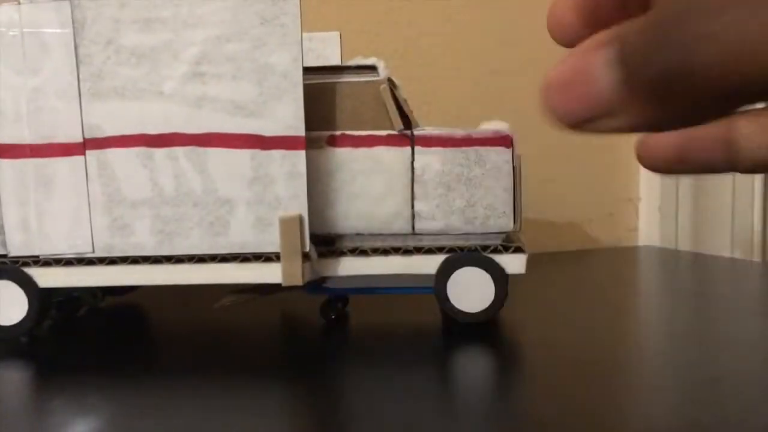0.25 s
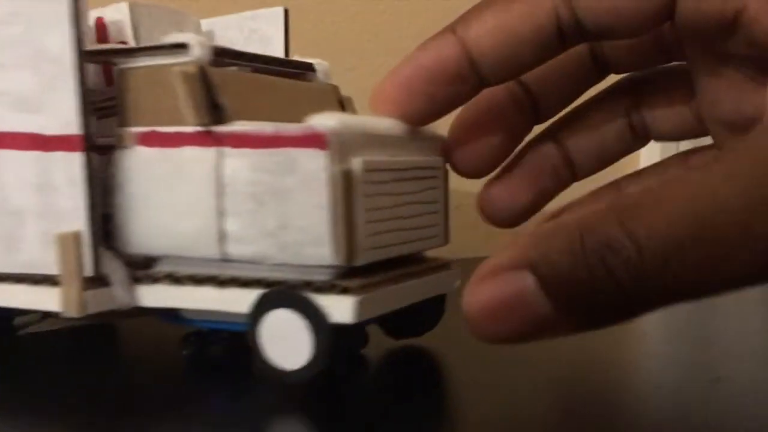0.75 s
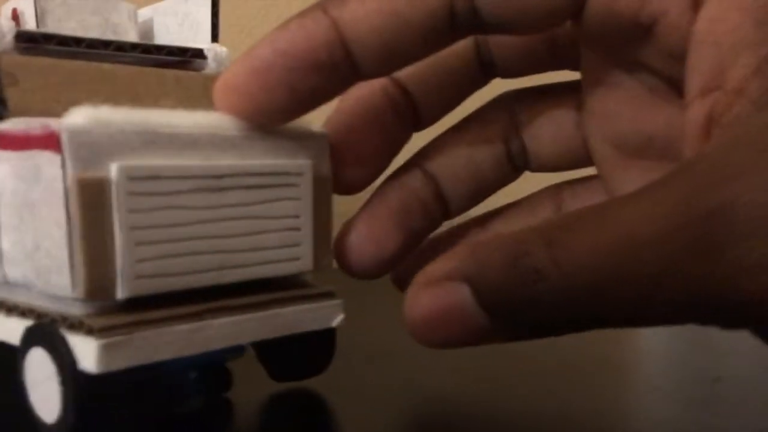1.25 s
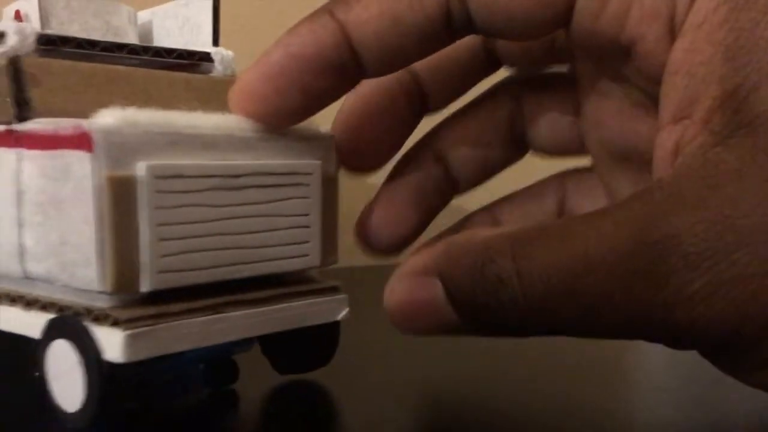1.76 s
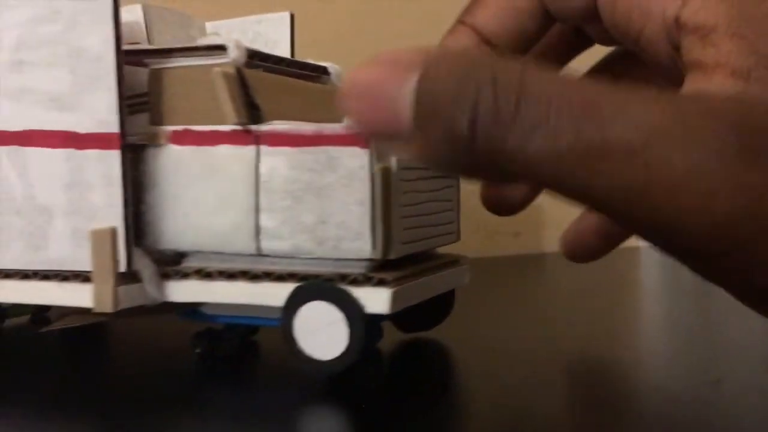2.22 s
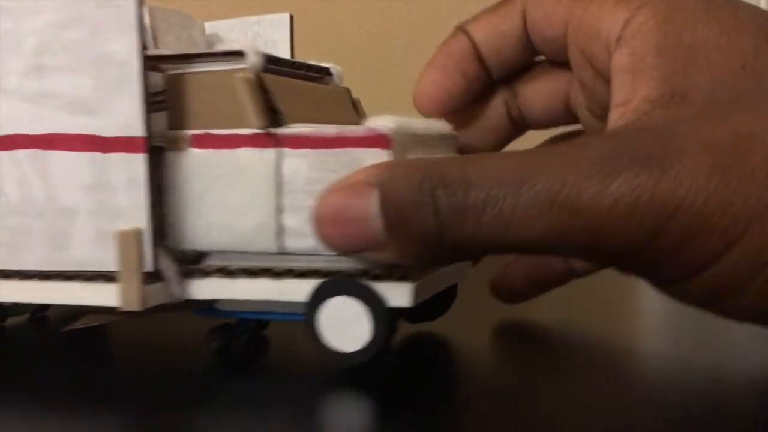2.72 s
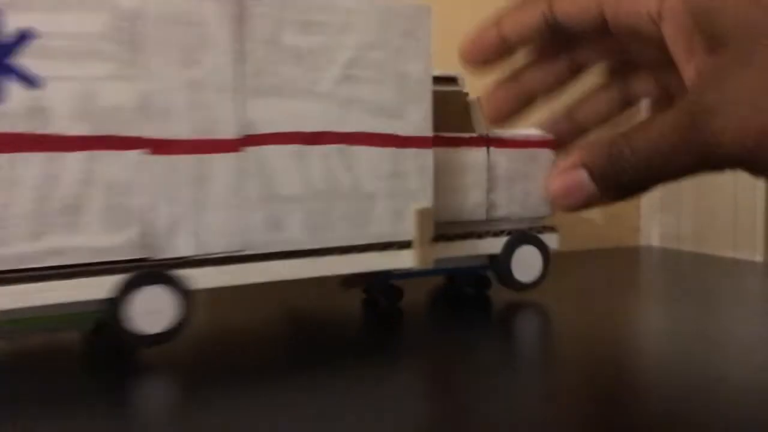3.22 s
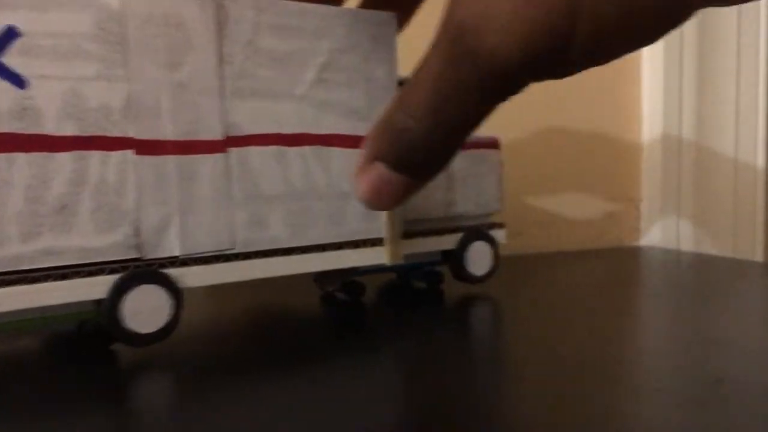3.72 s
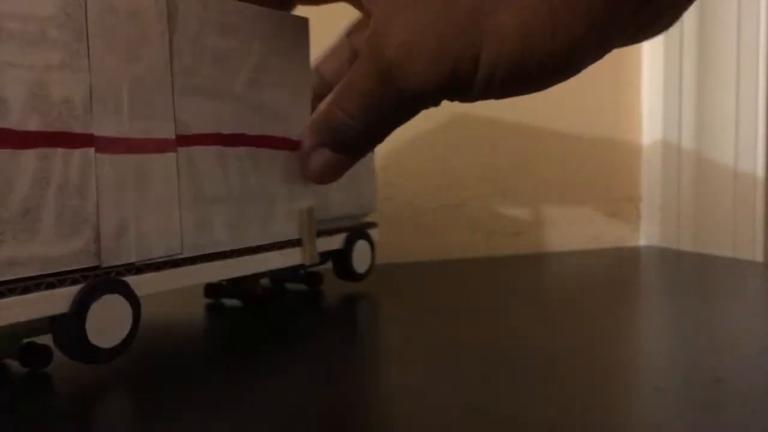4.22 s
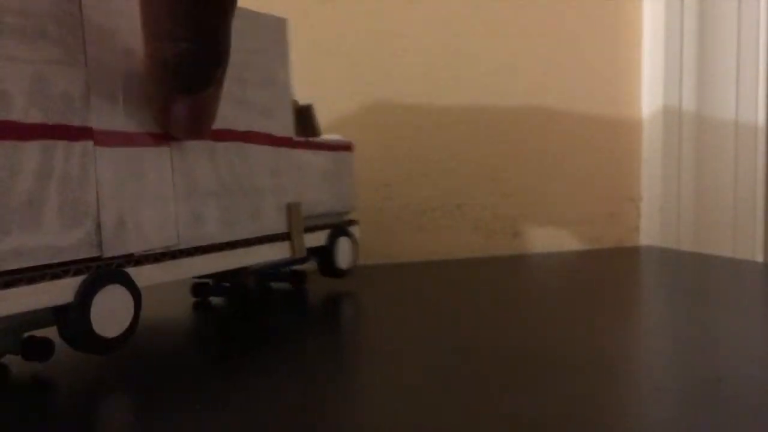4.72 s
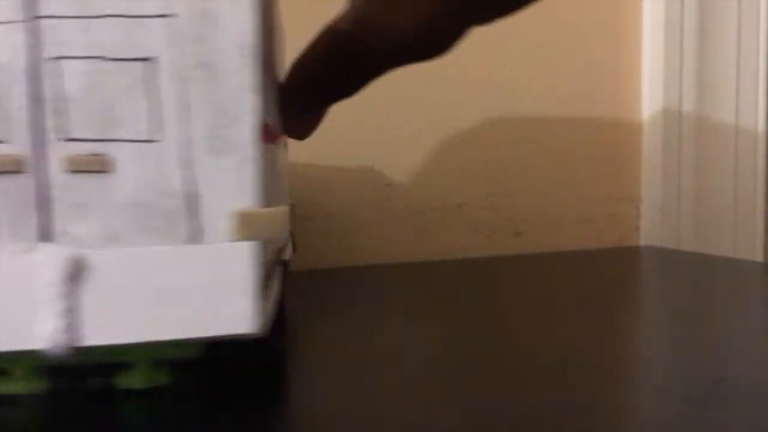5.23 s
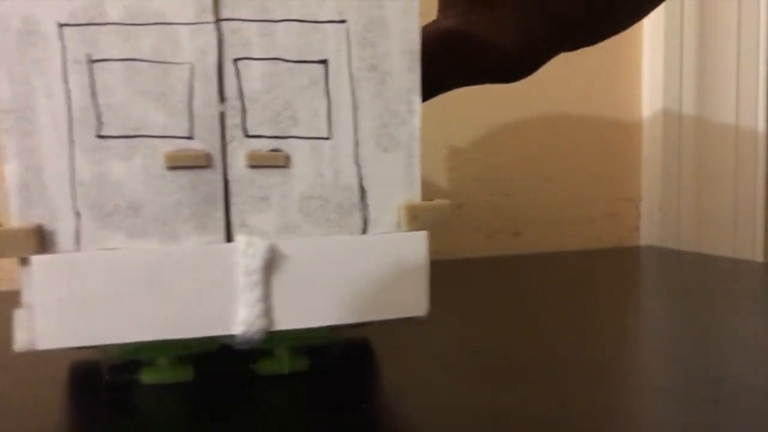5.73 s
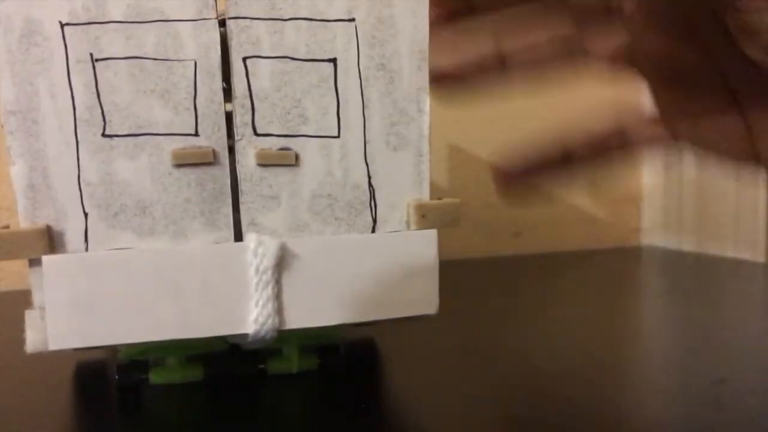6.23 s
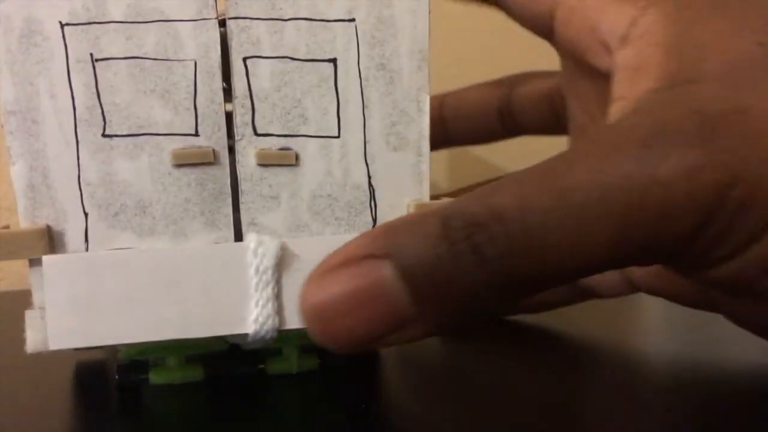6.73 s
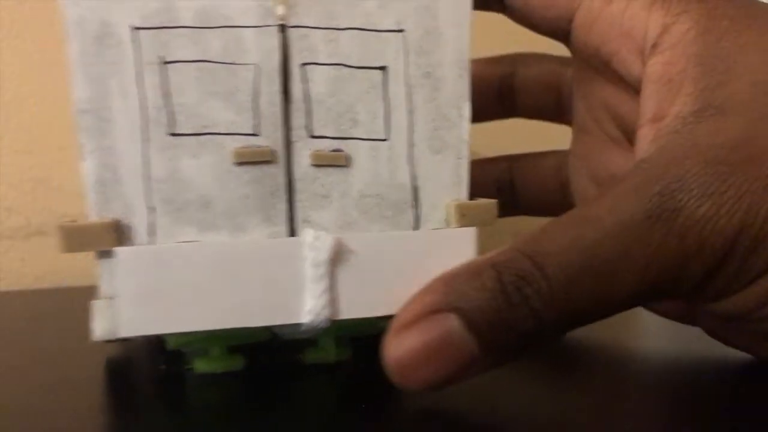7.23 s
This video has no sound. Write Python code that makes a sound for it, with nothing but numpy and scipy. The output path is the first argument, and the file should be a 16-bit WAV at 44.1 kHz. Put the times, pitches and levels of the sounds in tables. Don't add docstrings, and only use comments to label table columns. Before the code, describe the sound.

A hand shoves a light paper-skinned toy truck on small plastic wheels in short uneven strokes. Wheels stutter and squeak drily, axles tick, loose joints knock, the hollow desk hums under the scraping, and fingertips prick and hiss on paper. The strokes come with brief gaps; late on the chassis snaps down, near quiet follows, then a short weak scrape. The microphone is close, the room small and dull.

```python
import sys
import numpy as np
from scipy import signal
from scipy.fft import rfft, irfft, next_fast_len
from scipy.io import wavfile
from scipy.ndimage import uniform_filter1d

SR = 44100
rng = np.random.default_rng(int(sys.argv[2]) if len(sys.argv) > 2 else 0)


def generate_wav(signal):
    frames = np.transpose(np.atleast_2d(signal))
    scaled = np.clip(frames, -1, 1) * 32767
    pcm = np.round(scaled).astype(np.int16)
    wavfile.write(sys.argv[1], SR, pcm)


def voltage_ratio(level):
    return 10 ** (np.asarray(level, float) / 20)


N = 328986
SLIP_RISE_DB_PER_S = 1204


def rms_one(x):
    return x / np.sqrt(np.mean(x ** 2) + 1e-20)


def peak_one(x):
    return x / np.max(np.abs(x))


def band(x, low_hz, high_hz, order=2):
    return signal.sosfilt(signal.butter(order, [low_hz, high_hz], "band", fs=SR, output="sos"), x)


def drift(rate_hz):
    r = np.exp(-80 * np.pi * rate_hz / SR)
    noise = rng.standard_normal(N // 40 + 2002)
    slow = signal.lfilter([1], [1, -2 * r, r * r], noise)[2000:]
    return np.interp(np.arange(N) / 40, np.arange(len(slow)), rms_one(slow))


def resonance(x, hz, width_hz):
    r = np.exp(-np.pi * width_hz / SR)
    poles = [1, -2 * r * np.cos(2 * np.pi * hz / SR), r * r]
    return signal.lfilter([(1 - r * r) / 2, 0, (r * r - 1) / 2], poles, x + 1e-18)


def grains(per_s, spread_db, clump_db):
    sizes = voltage_ratio(spread_db * np.minimum(rng.exponential(1, N), 5))
    hits = sizes * (rng.random(N) < per_s / SR)
    return rms_one(hits * voltage_ratio(clump_db * drift(33))) * rng.choice([-1, 1], (3, N))


def body(forces, modes, wander_db, flicker_db=0, focus_hz=1000, focus_db=0):
    total = 0
    for k, (hz, width_hz, db) in enumerate(modes):
        level_db = db + wander_db * drift(5.1) + flicker_db * drift(19.4)
        level_db = level_db - focus_db * np.abs(np.log2(hz / focus_hz))
        total = total + (-1) ** k * voltage_ratio(level_db) * resonance(forces[k % 3], hz, width_hz)
    mode_hz = np.array(modes)[:, 0]
    sound = rms_one(band(total, mode_hz.min() * .75, min(mode_hz.max() * 1.2, 17000)))
    loudness = uniform_filter1d(uniform_filter1d(sound ** 2, size=3000), size=3000)
    return rms_one(sound / (loudness + .02) ** .42)


def swell_db(s, db, rise, fade, hold=0):
    t = np.arange(N) / SR - s
    return db + np.minimum(abs(rise) * t, 0) - abs(fade) * np.maximum(t - hold, 0)


def spans_db(tables):
    t = np.arange(N) / SR
    levels = []
    for s, *columns in map(np.transpose, tables):
        levels.append([np.interp(t, s, column, -150, -150) for column in columns])
    return np.max(levels, axis=0)


# pitch_hz [Hz], width_hz [Hz], level_db [dB]
HUM_MODES = [(44.6, 20, -4.5), (59.2, 3.1, 0.5), (70, 27, -8)]
# pitch_hz [Hz], level_db [dB per Hz]
HISS_COLOUR = [(50, -29.5), (85, 6.5), (233, -9), (830, -20.5), (1790, -28.5), (9000, -29.5),
               (12500, -24.5), (16000, -27)]
# start_s [s], level_db [dB], rise [dB per s], fade [dB per s]
BUMPS = [
    (.48, -64, 180, 90),
    (2.22, -62, 90, 46),
    (3.63, -63.5, 25, 10),
    (4.32, -57.5, 121.5, 181),
    (4.69, -55.5, 224, 93),
    (4.92, -56, 168.5, 79.5),
    (6.0, -63.5, 6, 17.5),
    (6.94, -52, 235.5, 93),
    (7.4, -66, 11, 55),
]


def room_tone(weight_db):
    hz, level_db = np.transpose(HISS_COLOUR)
    grid_hz = np.maximum(np.arange(N // 2 + 1) * SR / N, 1)
    colour = voltage_ratio(np.interp(np.log(grid_hz), np.log(hz), level_db))
    hiss = irfft(rfft(rng.standard_normal(N)) * colour, N)
    rumble = [resonance(noise, 57, 45) for noise in rng.standard_normal((3, N))]
    hum = body(rumble, HUM_MODES, wander_db=1.5)
    legs_db = np.maximum(-71.5, -68.5 + 0.12 * (weight_db + 50))
    hum_db = np.maximum(legs_db, np.max([swell_db(*bump) for bump in BUMPS], axis=0))
    return voltage_ratio(-67.5) * rms_one(hiss) + voltage_ratio(hum_db) * hum


# start_s [s], peak_db [dB]
PRICKS = [(0.4404, -53), (0.4527, -40), (0.8772, -39), (0.97, -44), (1.7493, -48), (1.9962, -47),
          (2.085, -46), (2.1384, -49), (2.355, -54), (2.339, -43), (2.6173, -55), (2.6213, -46),
          (2.7071, -40), (2.8318, -40), (2.981, -32), (3.0279, -40), (3.0368, -36), (3.0588, -38.5),
          (3.1032, -32), (3.2404, -37), (3.3476, -52), (3.371, -48), (3.5382, -35), (3.6055, -41),
          (3.667, -46), (3.722, -40), (3.7512, -32), (3.871, -45), (3.9687, -40.5), (4.146, -40),
          (4.235, -38), (4.2471, -40), (4.288, -40), (4.3243, -45), (4.644, -51), (4.6671, -42),
          (4.694, -37), (4.7709, -48), (4.7978, -33), (5.1181, -40), (5.2378, -39), (5.2887, -47),
          (5.3201, -44), (5.4389, -53), (6.935, -37), (7.052, -44)]


def pricks():
    out, t = np.zeros(N + 800), np.arange(800) / SR
    for (s, db), noise in zip(PRICKS, rng.standard_normal((len(PRICKS), 800))):
        burst = band(noise * np.exp(-t / 0.0014), 9500, 14800)
        out[round(s * SR):][:800] += voltage_ratio(db + 1.0) * peak_one(burst)
    return out[:N]


# start_s [s], length_s [s], level_db [dB], low_hz [Hz], high_hz [Hz]
SCUFFS = [
    (.441, 0.016, -48.5, 900, 4500),
    (1.306, .075, -74, 1500, 7000),
    (2.554, 0.0084, -67, 500, 1900),
    (2.615, 0.013, -53, 2800, 12000),
    (3.394, 0.041, -68, 700, 3900),
    (5.548, 0.042, -69.5, 5500, 12000),
    (6.308, 0.0086, -66.5, 200, 1800),
    (6.937, 0.011, -50, 600, 4000),
    (7.074, .02, -60, 9000, 15500),
]


def scuffs():
    out, t = np.zeros(N), np.arange(4000) / SR
    noises = rng.laplace(size=(len(SCUFFS), len(t)))
    for (s, length, db, low_hz, high_hz), noise in zip(SCUFFS, noises):
        level_db = db - SLIP_RISE_DB_PER_S * 2 * np.maximum(t - length, 0)
        out[round(s * SR):][:len(t)] += voltage_ratio(level_db) * rms_one(band(noise, low_hz, high_hz))
    return out


def click_bursts(rows):
    out, t = np.zeros(N + 2000), np.arange(2000) / SR
    fizz_band = signal.butter(2, 10500, "high", fs=SR, output="sos")
    for s, db, knock_db, fizz_db, hz in rows:
        burst = rng.standard_normal(2000) * np.exp(-t / .001) * np.minimum(t / .0002, 1)
        click = peak_one(band(burst, 4200, 10500)) + 0.48 * peak_one(resonance(burst, hz, 170))
        knock = 1.4 * resonance(burst, 1150, 600) - 0.93 * resonance(burst, 2220, 1230)
        knock = peak_one(knock + 0.81 * resonance(burst, 3890, 800))
        fizz = peak_one(signal.sosfilt(fizz_band, burst))
        mix = voltage_ratio(-1.5) * click + voltage_ratio(knock_db + 4.5) * knock + voltage_ratio(fizz_db + 1.0) * fizz
        out[round(s * SR):][:2000] += voltage_ratio(db) * mix
    return out[:N]


# start_s [s], peak_db [dB], knock_db under 4 kHz [dB re peak],
# fizz_db [dB re peak], pitch_hz of the ring [Hz]
KNOCKS = [(0.4447, -44, 4, -14, 4400), (0.4511, -47, -12, -13, 7200), (0.7868, -45.5, 14.5, -23, 6100),
          (1.3707, -39, -11.5, -34, 8640), (1.7876, -40, -4, -12, 5420), (2.3382, -43.5, 0, -20, 5460),
          (2.858, -47, -20, -15, 6370), (2.669, -58, -7, -1, 5400), (3.3486, -50, 8.5, -11, 6960),
          (3.372, -45, 3.5, -11, 6960), (3.4238, -58, 4, -20, 7280), (3.529, -48, -2, -4, 7300),
          (3.6682, -44, 6.5, -12, 5700), (3.7514, -36, 3.5, -19, 7100), (4.2886, -52, 7, -9, 7170),
          (4.3227, -42.5, -6, -12, 7400), (4.6454, -60, 5, -7, 5130), (4.6677, -41.5, 3.5, 1, 6500),
          (4.6965, -54.5, 16, 2, 6800), (4.798, -36.5, 12, -12, 8800), (5.3206, -43, -6, -16.5, 6900),
          (6.3092, -58, -7, -6, 5670), (6.3614, -68.5, 8, -15, 5670), (6.9378, -36, -4, -18, 7100),
          (6.879, -50.5, -2, -17, 5700), (7.325, -59, 1, -18, 7500), (7.189, -53, -12, -5, 8800),
          (7.208, -54, -8, -12, 5200), (5.801, -54, -20, -20, 5400), (2.417, -55.5, 2, -20, 8930),
          (6.948, -53, -6, -15, 9500)]


def joint_knocks():
    return click_bursts(KNOCKS)


# start_s [s], skid_db of the wheels [dB], weight_db rolling on the desk [dB]
PUSHES = [
    [(1.62, -84.5, -83), (1.84, -52, -49), (1.942, -49.5, -48), (2.192, -53.5, -49), (2.284, -67.5, -76),
     (2.32, -62, -55), (2.35, -57, -54), (2.36, -73, -62), (2.5, -91, -80)],
    [(2.65, -69, -64), (2.672, -50.5, -57), (2.712, -48.5, -48), (2.742, -56.5, -52), (2.798, -47.5, -47),
     (3.154, -39, -44.5), (3.214, -36, -52.5), (3.298, -51.5, -44.5), (3.47, -97, -79)],
    [(7.0, -64.5, -61.5), (7.06, -59, -65), (7.07, -60, -63), (7.138, -75.5, -69), (7.166, -58, -63),
     (7.284, -52, -59.5), (7.372, -58.5, -58), (7.406, -73, -62), (7.46, -76, -90)],
]
# start_s [s], skid_db [dB], weight_db [dB]
TURNS = [
    [(0.466, -47, -56), (0.494, -42.5, -44), (0.556, -36.5, -48.5), (0.59, -40.5, -47), (0.632, -40, -48.5),
     (0.7, -60, -48)],
    [(0.7, -50, -51.5), (0.888, -54.5, -53), (0.896, -45.5, -52.5), (1.06, -62, -55.5),
     (1.178, -53.5, -52.5), (1.33, -87, -73)],
    [(1.385, -72, -66), (1.389, -70, -64), (1.417, -71.5, -60), (1.477, -68, -63.5), (1.583, -104, -102),
     (1.6, -89, -78)],
    [(4.62, -118, -87), (4.652, -62, -63.5), (4.734, -47, -48.5), (4.826, -40, -51.5),
     (4.888, -44.5, -47.5), (4.95, -52, -58)],
    [(4.95, -47.5, -53.5), (5.158, -51.5, -61), (5.352, -48.5, -53), (5.394, -54, -66), (5.48, -65.5, -56),
     (5.55, -67, -74)],
    [(5.55, -62, -76), (5.596, -74, -64), (5.612, -64, -62), (5.698, -52.5, -62), (5.762, -66, -65),
     (5.77, -51, -63)],
]
# start_s [s], skid_db [dB], weight_db [dB]
TUGS = [
    [(3.48, -92, -92), (3.51, -63, -56), (3.556, -52.5, -51), (3.662, -60.5, -55), (3.758, -48, -42.5),
     (3.792, -51.5, -54), (3.9, -59, -50)],
    [(3.9, -56, -73), (3.914, -58.5, -53.5), (4.02, -50, -45.5), (4.16, -46.5, -47.5), (4.26, -61.5, -59.5),
     (4.302, -96, -60), (4.42, -84, -79)],
]
# start_s [s], skid_db [dB], weight_db [dB], rise [dB per s], fade [dB per s]
JOLTS = [(0.445, -51, -57, 3000, 300), (.896, -52, -54, 1500, 152), (2.413, -76, -63, 1495, 800),
         (3.168, -43, -60, 400, 300), (.728, -63, -62, 2006, 300), (3.758, -62, -61, 505, 250),
         (4.291, -63.5, -53, 2003, 301), (5.178, -41, -53.5, 202.5, 260), (5.785, -67.5, -72, 1496, 187),
         (6.308, -85, -55, 2995, 302), (6.49, -75.5, -79, 122, 195), (6.6, -80.5, -81, 43, 57),
         (6.879, -63, -56, 270, 195), (6.929, -50.5, -50.5, 2000, 305)]


def hand():
    jolts = []
    for s, skid, weight, rise, fade in JOLTS:
        jolts.append([swell_db(s, db, rise, fade) for db in (skid, weight)])
    strokes = spans_db(PUSHES + TURNS + TUGS)
    return 10 * np.log10(voltage_ratio(2 * strokes) + voltage_ratio(2 * np.max(jolts, axis=0)))


# start_s [s], hold_s [s], level_db [dB], fade [dB per s]
FINGER_SLIPS = [(0.445, 0.0043, -67, 600), (0.876, .004, -51.5, 320), (1.767, 0.078, -59.5, 30),
                (1.87, 0.23, -60.5, 22), (2.725, 0.0027, -53, 800), (3.533, .01, -59.5, 58),
                (3.757, 0.003, -60, 500), (4.297, .03, -69, 502), (4.149, 0.0086, -48, 138),
                (4.698, .003, -54, 1800), (4.765, 0.0048, -55, 300), (6.313, .003, -68, 197),
                (6.48, 0.0066, -68, 303), (6.994, .005, -62.5, 400), (6.82, 0.031, -67, 250),
                (7.062, .01, -52, 172)]
# pitch_hz [Hz], width_hz [Hz], level_db [dB]
PAPER = [(5500, 500, 8), (7920, 7000, 0), (11500, 1300, -12), (12900, 3000, -0.5), (14700, 1100, -4),
         (14960, 1200, -8.5)]
# start_s [s], pitch_hz [Hz]
SHEEN = [(0.5, 12000), (1.7, 13900), (2.25, 13800), (2.9, 11500), (3.6, 13200), (4.2, 14400), (5.0, 11000),
         (7.1, 13400)]
LET_GO_S = 2.375
LIGHT_GRIP_S, LIGHT_GRIP_DB = 5.4, -5.5


def fingers(skid_db):
    t = np.arange(N) / SR
    rub = grains(9000, spread_db=3.8, clump_db=2.2)
    slips = np.array([swell_db(s, db, SLIP_RISE_DB_PER_S, fade, hold)
                      for s, hold, db, fade in FINGER_SLIPS])
    slips[np.array(FINGER_SLIPS)[:, 0] < LET_GO_S, round(LET_GO_S * SR):] = -150
    holding_db = -63.5 + 0.79 * (skid_db + 50) + LIGHT_GRIP_DB * (t > LIGHT_GRIP_S)
    sheen_hz = np.interp(t, *np.transpose(SHEEN))
    hiss = body(rub, PAPER, wander_db=8.0, focus_hz=sheen_hz, focus_db=12.5)
    return voltage_ratio(np.maximum(slips.max(axis=0), holding_db)) * hiss


# pitch_hz [Hz], width_hz [Hz], level_db [dB]
DESK = [(156, 11, -6.5), (190.3, 18.8, 1), (226.5, 14, -7.5), (276, 25, -7), (314.8, 49, -10.5),
        (119, 39, -14)]
BOX = [(425, 140, -0.5), (564, 54, -5.5), (690.6, 37, -2.5), (813, 81, -8), (902, 124, -7.5),
       (1050, 120, -7.5), (1170, 77, -3.5), (1347, 110, -6)]
CHASSIS = [(1580, 77, -0.5), (1796, 130, -3.5), (2032, 120, -4), (2240, 130, -4.5), (2690, 90, -2.5),
           (2966, 130, -10.5), (3204, 157, -2), (3573, 150, -5.5), (3886, 40, -4), (4366, 350, -10.5)]
WHEELS = [(4876, 180, 6.5), (5460, 630, 4.5), (6170, 510, -3.5), (7280, 1200, -5.5), (8640, 150, -33),
          (8880, 800, 1), (9450, 160, -11)]
# start_s [s], box_hz [Hz], chassis_hz [Hz], wheels_hz [Hz]
FOCUS = [(0.55, 930, 3000, 5080), (0.8, 1170, 2570, 6170), (1.1, 1050, 2580, 6320), (2.0, 1100, 2370, 5670),
         (2.9, 980, 2740, 5670), (3.2, 1170, 3000, 5250), (3.85, 1030, 2400, 7280), (4.2, 980, 2950, 6270),
         (4.75, 1000, 2260, 5800), (5.15, 900, 2740, 7800), (5.701, 1000, 3050, 5830),
         (7.2, 933, 2450, 6220)]
BOX_DB, BOX_SKID_SHARE = 1, 0.65
WHEELS_DB, WHEELS_SLOPE = -8, 1
SPECKS_PER_S, SPECKS_DB = 45, -14


def scraping(skid_db, weight_db):
    desk, chassis = voltage_ratio(weight_db), voltage_ratio(skid_db)
    box = voltage_ratio(BOX_DB + BOX_SKID_SHARE * skid_db + (1 - BOX_SKID_SHARE) * weight_db)
    wheels = voltage_ratio(WHEELS_DB - 50 + WHEELS_SLOPE * (skid_db + 50))
    s, *focus = np.transpose(FOCUS)
    box_hz, chassis_hz, wheels_hz = [np.interp(np.arange(N) / SR, s, hz) for hz in focus]
    contact = grains(5500, spread_db=3.8, clump_db=1.4)
    chatter = grains(3500, spread_db=4.0, clump_db=2.5)
    specks = grains(SPECKS_PER_S, spread_db=2.5, clump_db=3.0)[0]
    specks = np.convolve(specks, rng.standard_normal(40), "same")
    cracks = resonance(specks, 9200, 550) + .5 * resonance(specks, 7300, 400)
    out = desk * body(contact, DESK, wander_db=2.0)
    out += box * body(contact, BOX, wander_db=3.5, flicker_db=0.5, focus_hz=box_hz, focus_db=6.0)
    out += chassis * body(contact + .5 * chatter, CHASSIS, wander_db=3.5, flicker_db=1,
                          focus_hz=chassis_hz, focus_db=4.5)
    out += wheels * body(.6 * contact + chatter, WHEELS, wander_db=3.5, flicker_db=2.5,
                         focus_hz=wheels_hz, focus_db=9)
    return out + wheels * voltage_ratio(SPECKS_DB) * rms_one(cracks)


# start_s [s], peak_db [dB], pitch_hz [Hz]
CLACKS = [(0.4671, -31.5, 2130), (0.5235, -18, 890), (0.6175, -26, 3230), (0.7098, -37, 2140),
          (0.726, -41, 1070), (0.8492, -32.5, 947), (0.8954, -28.5, 3160), (1.143, -41, 1100),
          (1.3701, -42, 2880), (1.769, -44, 1410), (1.906, -32, 2690), (2.0084, -31, 1080),
          (2.4072, -46, 1160), (0.6265, -28, 3300), (2.6632, -43, 1170), (2.796, -42, 3190),
          (3.1389, -25, 1180), (3.5058, -40, 1240), (3.557, -35.5, 3470), (3.701, -38, 1250),
          (3.7226, -36, 1220), (3.7718, -33, 3370), (4.0036, -31, 1200), (4.292, -41.5, 1540),
          (4.647, -48, 2340), (4.7182, -32.5, 3130), (4.7548, -27.5, 1910), (5.03, -32, 3260),
          (5.144, -31, 3880), (5.164, -27.5, 2340), (5.307, -45, 3220), (5.385, -36, 3200),
          (6.9287, -45, 2590), (7.161, -50, 1230), (7.2766, -33, 1170), (7.3248, -38, 1210)]


def clacks():
    out, t = np.zeros(N + 800), np.arange(800) / SR
    for (s, db, hz), noise in zip(CLACKS, rng.standard_normal((len(CLACKS), 800))):
        burst = noise * np.exp(-t / 0.0059)
        ring = peak_one(resonance(burst, hz, 220))
        knock = voltage_ratio(-15) * peak_one(band(burst, 900, 6000))
        out[round(s * SR):][:800] += voltage_ratio(db - 6.0) * (ring + knock)
    return out[:N]


# start_s [s], peak_db [dB], fizz_db over 10 kHz [dB re peak], pitch_hz of the ring [Hz]
TICKS = [(0.47, -37, -21, 6860), (0.7344, -32, -22, 7200), (0.8644, -58, 1, 5470), (0.972, -44, -18, 7300),
         (1.1315, -46, -12, 5330), (1.705, -46.5, -15, 5500), (1.751, -46, -9, 5500),
         (2.3467, -44, -16, 8900), (2.4075, -49.5, -24, 8760), (2.617, -47, -5, 8600),
         (2.707, -50, -12, 5460), (2.982, -30, -21, 4760), (3.241, -38, -19, 5770),
         (3.539, -39.5, -18, 7200), (3.547, -41, -10, 9100), (3.7219, -44, -1, 7260),
         (3.774, -36, -20, 9250), (3.8714, -53, -1, 9000), (3.9684, -47, -6, 6040), (4.117, -37, -5, 8800),
         (4.2354, -50, 8, 7890), (4.248, -39.5, -21, 6100), (5.12, -41, -15, 8900), (5.367, -41, -21, 8200),
         (5.441, -46, -13, 8930), (5.504, -46.5, -17.5, 7340), (5.552, -47, -19, 8800),
         (6.9305, -37.5, -25, 8850), (6.962, -49, -15, 7180), (7.055, -40, 4, 8350)]


def axle_ticks():
    return click_bursts([(s, db, -16, fizz_db, hz) for s, db, fizz_db, hz in TICKS])


# [dB re skid, or re weight for the desk]
SINGS = [(0.49, 0.07, 830, 31, -0.5), (0.47, 0.086, 2000, 79, -7), (0.67, 0.29, 196, 9.8, -0.5),
         (0.707, .25, 2300, 55, -3), (0.73, 0.235, 3550, 100, -4.5), (0.72, 0.223, 1070, 53, -4),
         (0.59, 0.094, 4200, 500, -4.5), (1.11, 0.113, 1060, 91, 1), (1.5, .42, 270, 16, -7.5),
         (1.88, 0.3, 3190, 83, -8), (1.85, 0.377, 1280, 59, -3.5), (2.72, 0.35, 187, 21, -2),
         (3.02, .22, 4550, 1100, -8), (3.0, .23, 1130, 81, -5.5), (3.02, 0.061, 3400, 200, -2),
         (3.7, 0.16, 3500, 90, -11), (4.08, 0.16, 3200, 350, -3.5), (6.5, 0.08, 1900, 200, -4),
         (4.7, 0.21, 246, 40, -1), (4.85, 0.26, 3500, 51, -9), (5.14, 0.11, 2240, 63, -10),
         (5.15, 0.28, 670, 27, -8), (5.14, 0.24, 159, 51, -0.5), (4.2, .12, 2540, 90, -11),
         (7.17, 0.15, 1190, 180, 0), (1.8, 0.42, 14100, 1500, -6.5), (4.14, 0.1, 13500, 1200, -5),
         (1.64, 0.61, 5480, 260, -13), (1.08, .16, 5450, 150, -16), (1.85, 0.31, 266, 28, -5),
         (0.727, 0.13, 276, 27, -2), (4, 0.137, 320, 20, -2.5), (2.98, 0.157, 842, 46, -8),
         (6.1, .03, 3600, 500, -5), (6.44, 0.068, 3700, 730, 2)]
SING_EDGE_S, DESK_TOP_HZ = .02, 400


def sings(skid_db, weight_db):
    out, force = np.zeros(N), grains(5000, spread_db=3.5, clump_db=2.5)
    for k, (s, length, hz, width_hz, db) in enumerate(SINGS):
        span = slice(round(s * SR), round((s + length) * SR))
        push = force[k % 3, span]
        push = push * np.abs(push) ** (.5 * (hz > 5000))
        ring = rms_one(resonance(resonance(push, hz, 4 * width_hz), hz, width_hz))
        t = np.arange(len(ring)) / SR
        edges = np.clip(np.minimum(t, length - t) / SING_EDGE_S, 0, 1)
        drive_db = weight_db if hz < DESK_TOP_HZ else skid_db
        out[span] += voltage_ratio(db + drive_db[span]) * edges * ring
    return out


# pitch_hz [Hz], level_db [dB], t60_s, time to fall by 60 dB [s]
SNAP_MODES = [(1030, 5, .010), (1190, -34, .18), (1250, -36, .4), (2550, -3, .008), (3340, -4, .012),
              (5520, -4, .009), (5600, -38, .14), (6600, -8, .008), (7900, -5, .006)]
# start_s re snap [s], level_db [dB]
SLIPS = [
    (-.0155, -15),
    (-.0075, -17),
    (-.002, -18),
    (0, 0),
]
SNAP_S, SNAP_DB = 5.7755, -26


def snap():
    t = np.arange(SR // 2) / SR
    shape = np.exp(-((t - .0008) / .0007) ** 2) + .25 * np.exp(-t / .004) * (t > .001)
    crackle = band(rng.standard_normal(len(t) + 1), 10500, 15000, order=1)[1:] * shape
    late = np.maximum(t - .0006, 0)
    rings = 0
    for hz, db, t60 in SNAP_MODES:
        swell = 1 - np.exp(-late * hz / 1.3)
        rings = rings + voltage_ratio(db - 60 * late / t60) * swell * np.sin(2 * np.pi * hz * late)
    hit = voltage_ratio(1) * crackle + rings
    soft = resonance(hit, 1100, 900) + .15 * hit
    out = np.zeros(N)
    for s, db in SLIPS:
        i = round((SNAP_S + s) * SR)
        out[i:i + len(t)] += voltage_ratio(SNAP_DB + db) * (soft if s else hit)
    return out


ROOM_T60_S, ROOM_DB, WALL_CUT_HZ = 0.22, -14, 1430


def room(x):
    size = next_fast_len(N + SR)
    hz = np.arange(size // 2 + 1) * SR / size
    walls = 1 / np.sqrt(1 + (hz / WALL_CUT_HZ) ** 2)
    tail = 0
    for k, lag in enumerate(rng.uniform(.011, .037, 10)):
        loop = voltage_ratio(-60 * lag / ROOM_T60_S) * walls ** 0.9 * np.exp(-2j * np.pi * hz * lag)
        tail = tail + (-1) ** k * loop / (1 - loop)
    return irfft(rfft(x, size) * tail, size)[:N]


def scene():
    skid_db, weight_db = hand()
    toy = pricks() + scuffs() + joint_knocks() + fingers(skid_db) + scraping(skid_db, weight_db)
    toy += clacks() + axle_ticks() + sings(skid_db, weight_db) + snap()
    return (toy + voltage_ratio(ROOM_DB) * room(toy) + room_tone(weight_db))[None]


def roll_off(x):
    return signal.sosfilt(signal.butter(12, 15850, fs=SR, output="sos"), x)


# pitch_hz [Hz], width_hz [Hz], depth [0-1]
PORT_DIPS = [(4970, 500, 0.35), (10400, 700, 0.35)]
CUTOFF_HZ = 16000


def record(dry):
    for hz, width_hz, depth in PORT_DIPS:
        dry = dry - depth * resonance(dry, hz, width_hz)
    top_cut = signal.cheby2(18, 50, CUTOFF_HZ * 1.02, fs=SR, output="sos")
    return roll_off(signal.sosfilt(top_cut, dry))


dry = scene()
out = record(dry)
generate_wav(out)
```